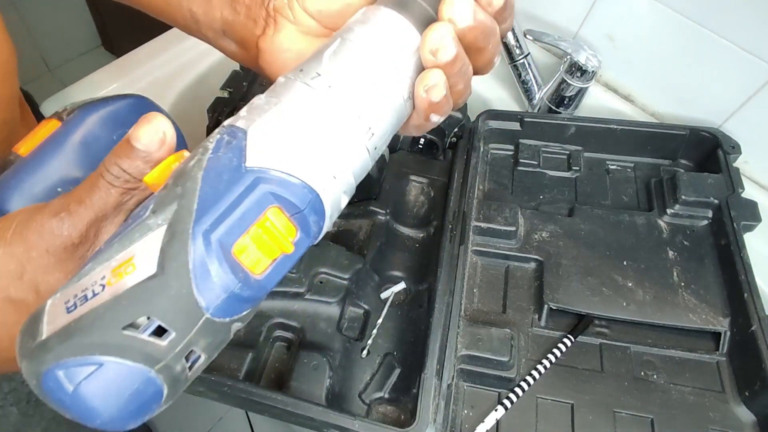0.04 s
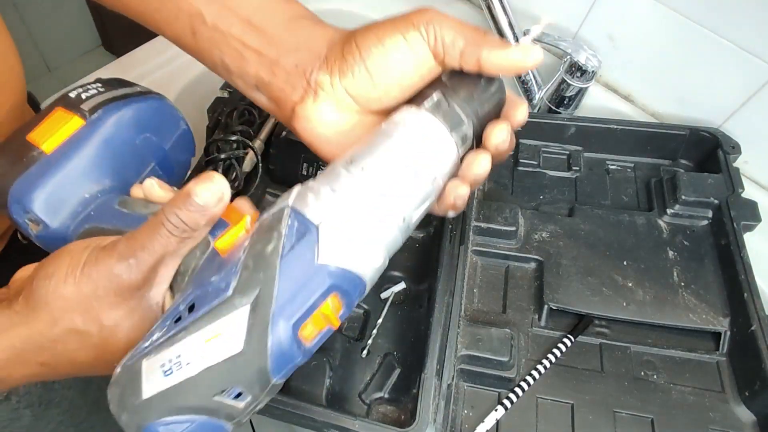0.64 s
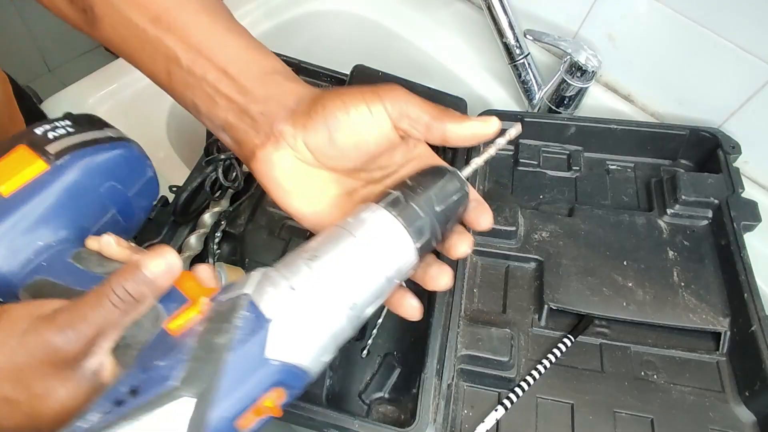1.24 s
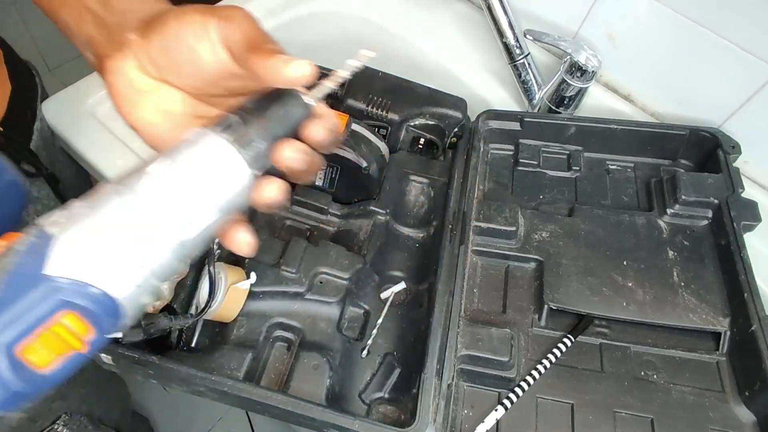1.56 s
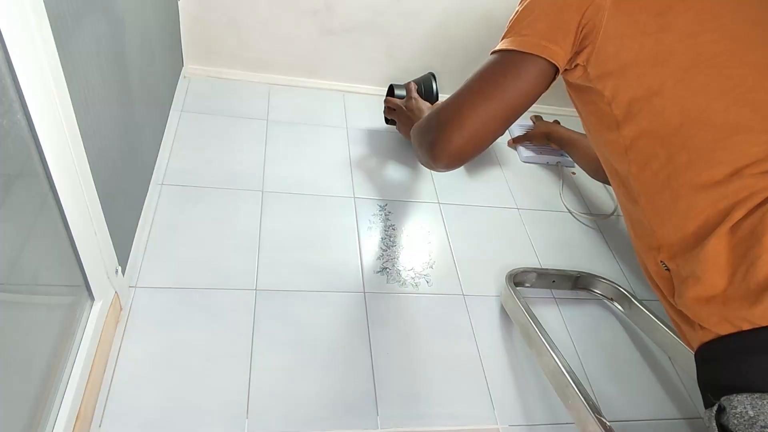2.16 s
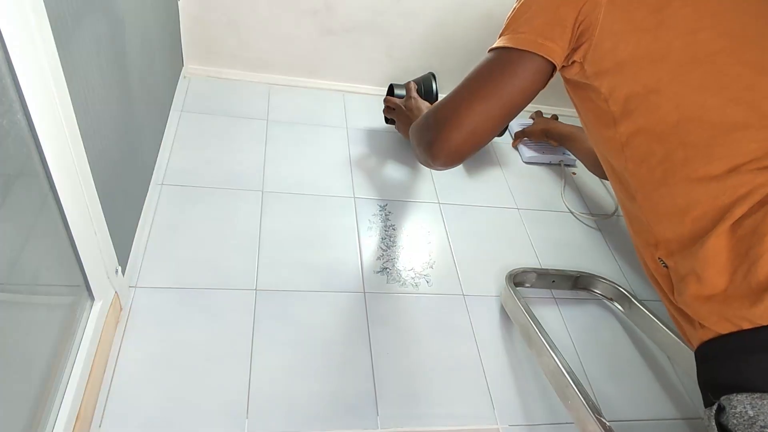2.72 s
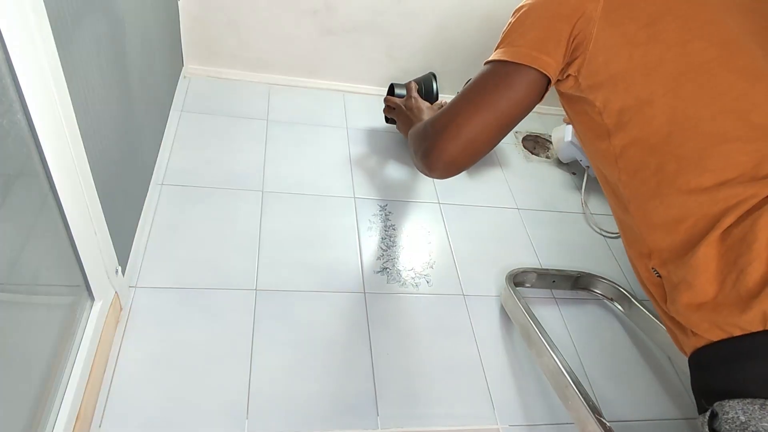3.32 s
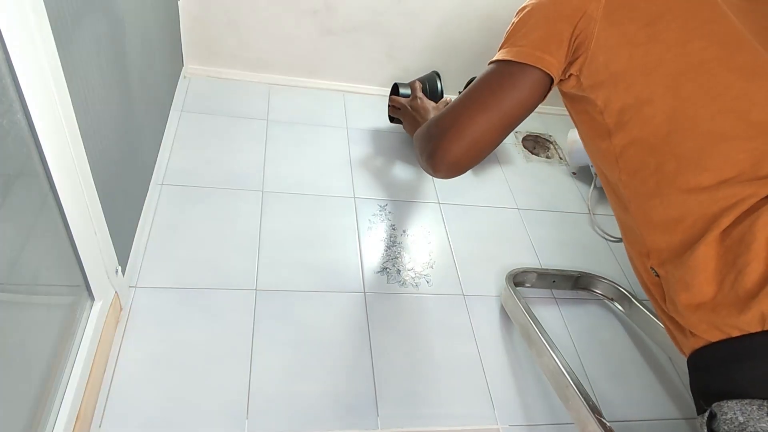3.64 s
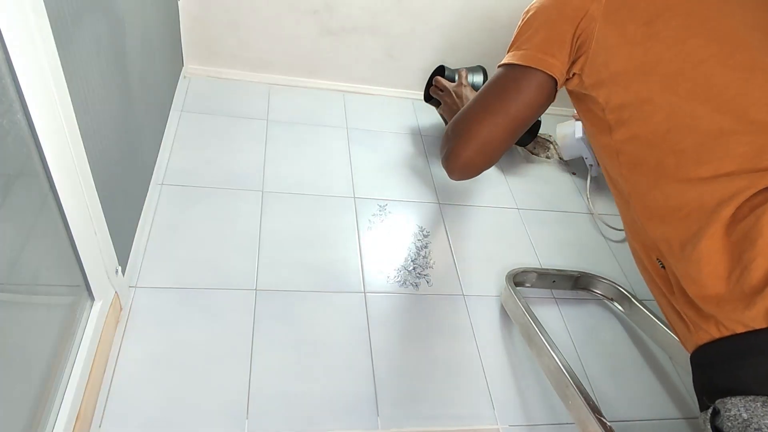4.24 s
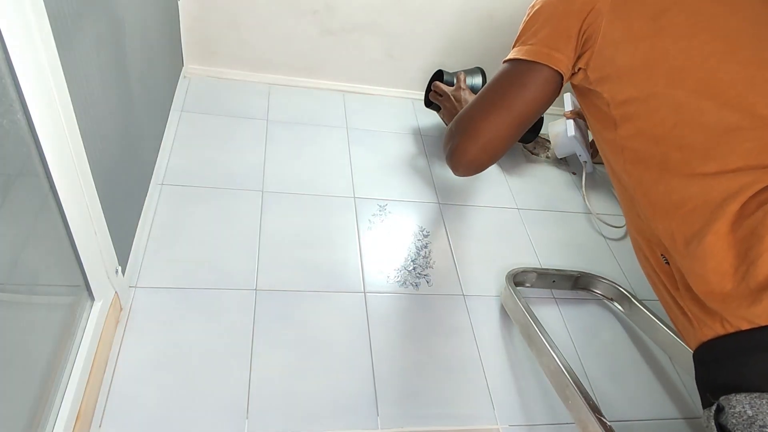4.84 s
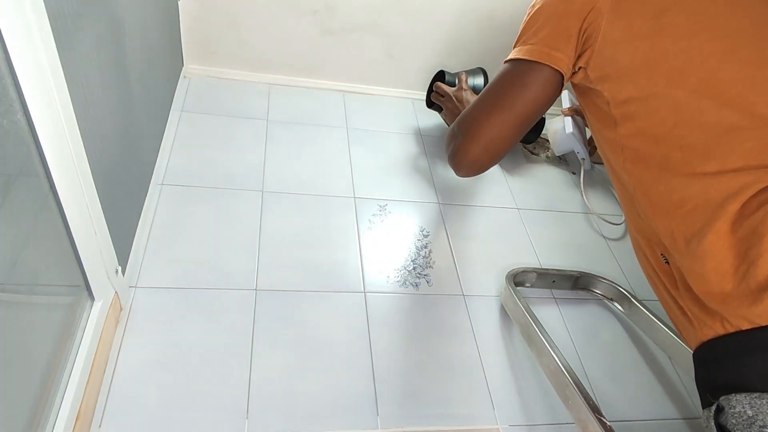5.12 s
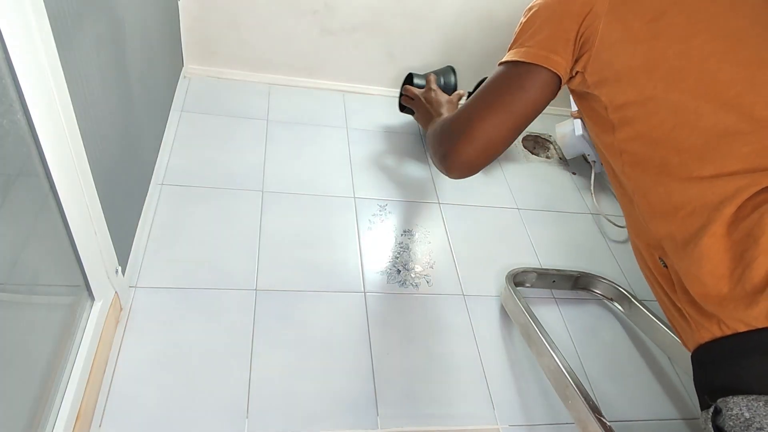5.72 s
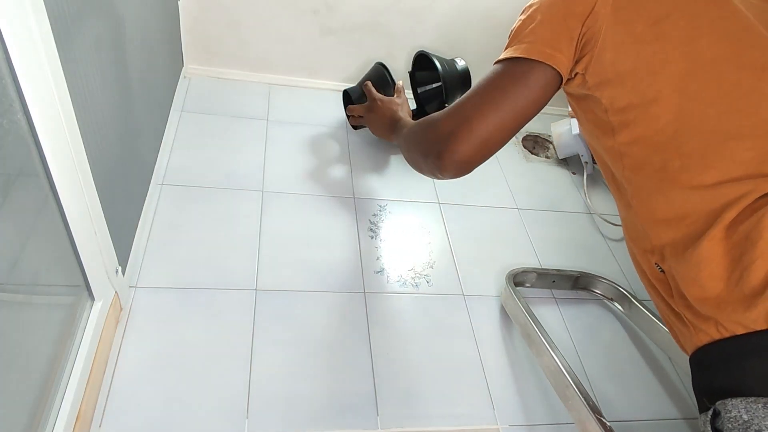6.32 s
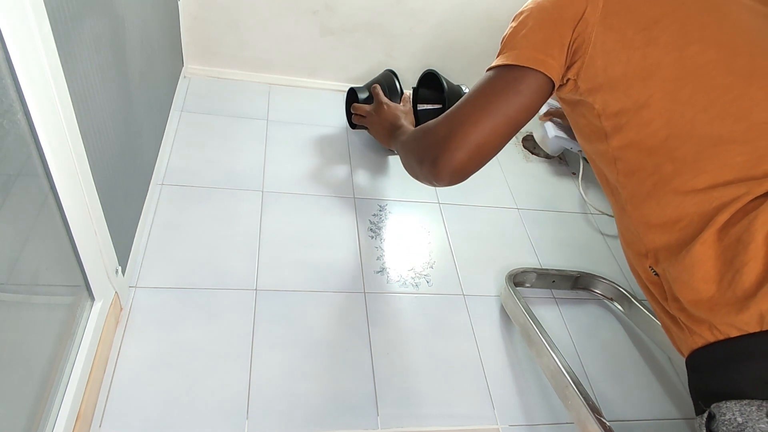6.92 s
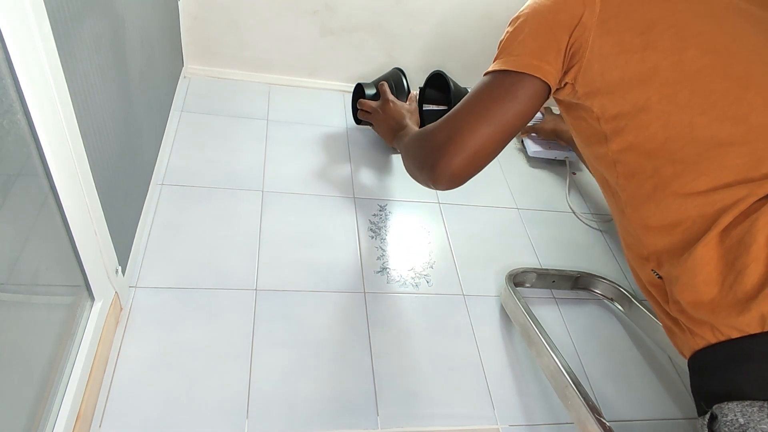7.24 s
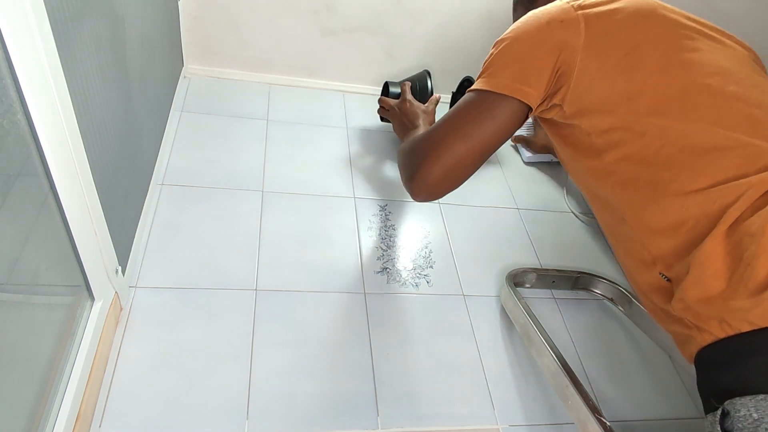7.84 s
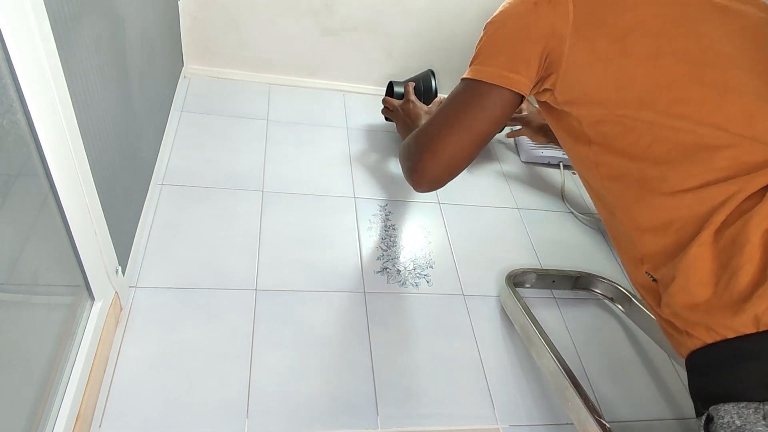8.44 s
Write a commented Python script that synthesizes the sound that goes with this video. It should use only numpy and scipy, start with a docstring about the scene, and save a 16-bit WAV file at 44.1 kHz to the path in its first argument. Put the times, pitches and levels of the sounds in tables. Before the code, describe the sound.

A cordless drill is already whirring at the start, close to the microphone and slightly left. It runs in five quick bursts, ending at about 1.4 seconds. The motor squeals, the gears whine upward and rattle, and each burst stops with a clack. A soft rub and a light tick follow around 2 seconds.

From 2.5 to 3 seconds, an arm's length further off and quieter, a hollow plastic mount scrapes and knocks against the wall with dull thumps. Lighter taps continue until about 4.5 seconds, and a hand rubs softly on the plastic from 3.5 to 6. After a lull, a sharper hollow knock comes near 6.8 seconds, followed by busier knocks, gritty scrapes and a few low thumps until about 8.6. The small tiled room rings briefly after the sounds. Faint hiss and a thin, steady high tone lie behind throughout.

```python
"""A cordless drill whirs close to the microphone in five quick bursts, a hand gripping its chuck:
the motor squeals, the gears whine up and rattle, then clack as the brake stops them.
An arm's length further off, a hollow plastic mount is shifted, scraped and knocked against a wall,
with a few dull thumps. A small tiled room rings after the drill and the mount.
Faint hiss and a thin, steady high tone lie behind it all."""
import sys
import numpy as np
from scipy import signal
from scipy.fft import rfft, irfft
from scipy.io import wavfile

SR = 44100
rng = np.random.default_rng(int(sys.argv[2]) if len(sys.argv) > 2 else 0)


def unload_audio(sound):
    """Save the sound as a 16-bit wav file, at the path given as the first command line argument."""
    columns = np.transpose(np.atleast_2d(sound))
    # keep every value between -1 and 1, then stretch to whole-number steps
    steps = np.round(np.clip(columns, -1, 1) * 32767)
    wavfile.write(sys.argv[1], SR, steps.astype(np.int16))


N = 382499
T = np.arange(N) / SR

# Pulls of the trigger; the first is already under way. Each row: press, rotor start and braking in
# seconds, top tooth rate in Hz, sluggishness of the run-up, then level, treble, squeal and whistle in dB.
TRIGGER_PULLS = [(-.19, -0.172, 0.068, 1705, 1.35, -15, 0.5, -39, 1),
                 (0.315, 0.35, 0.5, 1480, 1.55, -16, -1.5, -30, -2),
                 (0.62, 0.639, 0.795, 1552, 1.5, -16.5, -.5, -31.5, -6),
                 (0.933, .955, 1.138, 1634, 1.15, -16.5, .5, -31.5, 1),
                 (1.233, 1.248, 1.383, 1432, 1.55, -16.7, -2, -32, -5)]
def drill(run_up_share=.88, kick_share=.33, kick_s=.018, sag_share=.03, sag_s=.025, brake_s=.033):
    """Rattle and whine of a motor that jolts, runs up, sags as the trigger lifts and is braked."""
    size, teeth_per_turn = 70000, 5
    t = T[:size]
    speed, tooth_hz, gain, treble_gain, whistle = np.zeros((5, size))
    for _, start, brake, top_hz, sluggish, db, treble_db, _, whistle_db in TRIGGER_PULLS:
        progress = np.clip((np.minimum(t, brake) - start) / (run_up_share * (brake - start)), 0, 2)
        run_up = np.sin(np.pi / 2 * progress) ** sluggish
        kick = np.clip((t - start) / kick_s, 0, 1)
        sag = 1 - sag_share * np.clip(1 + (t - brake) / sag_s, 0, 1) ** 2
        drive = kick * (kick_share + (1 - kick_share) * run_up) * sag
        braking = np.clip(1 - (t - brake) / brake_s, 0, 1)
        spin = drive * braking
        speed += spin
        tooth_hz += top_hz * spin
        gain += undb(db) * drive ** .35 * braking
        treble_gain += undb(treble_db) * spin ** .67  # faster is brighter
        whistle += undb(whistle_db) * spin ** 5  # only near top speed
    grip = 1 + .005 * walk(600, size)  # the hand makes the speed waver
    rotor_phase = 2 * np.pi * np.cumsum(tooth_hz * grip) / SR / teeth_per_turn
    whine = gear_whine(rotor_phase, speed, whistle)
    rattle = gear_rattle(rotor_phase, speed) + chuck_jingle(size)
    low = cut(rattle, 2000, "low")
    rattle = low + treble_gain * (rattle - low)
    return np.pad(gain * rattle, (0, N - size)), np.pad(gain * whine, (0, N - size))


# Partials of the gears. Each row: multiple of the rotor rate, level in dB, power of growth with speed.
GEAR_PARTIALS = [(1, -24, .3), (2, -23, .7), (3, -21, 1), (4, -23, 1), (5, -16, .3), (10, -2, 1.9),
                 (14, -18, 2), (16, -17, 3), (17, -18, 3), (20, -19, 3), (25, -18, 3), (30, -18, 3),
                 (35, -20, 4)]
def gear_whine(rotor_phase, speed, whistle, level_db=1):
    """Meshing teeth sing under a wavering load; their third harmonic whistles."""
    size = len(speed)
    whine = sum(undb(db + 2.5 * walk(170, size)) * speed ** growth * np.sin(k * rotor_phase)
                for k, db, growth in GEAR_PARTIALS)
    whine += whistle * undb(2 * walk(170, size)) * np.sin(15 * rotor_phase)
    return undb(level_db) * whine


# The gearbox, heard from close by. Each row: frequency in Hz, level in dB.
GEARBOX_SPECTRUM = [(120, -57), (200, -24), (253, -14), (471, -12), (728, -0.5), (842, -5), (1190, -4),
                    (2210, -2), (2900, -1.5), (3550, -4.5), (4300, -0.5), (5050, -0.5), (7350, -8.5),
                    (8500, -5.5), (12000, -13.5), (15500, -13.5)]
# Resonances of the drill's housing. Each row: frequency in Hz, width in Hz, level in dB.
HOUSING_MODES = [(682, 82, 10), (1140, 110, -9.5), (3700, 120, -10.5), (4470, 40, -7), (5400, 380, 6)]
def gear_rattle(rotor_phase, speed, throb=.45, rasp_db=-3, housing_db=-9.5):
    """Loose teeth and brushes strike in bunches once a turn; worn teeth rasp alike on every turn."""
    size, harmonics = len(speed), 45
    bunching = 1 + throb * np.sin(rotor_phase)
    loose = unit(grains(spread_db=2.5, size=size) * bunching * undb(2.5 * walk(300, size)))
    rasp = sum(undb(4 * walk(25, size)) * np.sin(k * rotor_phase + 2 * np.pi * rng.random())
               for k in range(2, harmonics)) * np.sqrt(2 / harmonics)
    strikes = loose + undb(rasp_db) * speed * rasp
    return unit(colour(strikes, GEARBOX_SPECTRUM) + undb(housing_db) * ring(strikes, HOUSING_MODES))


# Resonances of the steel chuck. Each row: frequency in Hz, width in Hz, level in dB.
CHUCK_MODES = [(5894, 70, 2.5), (6300, 140, -2), (8350, 22, -1.5), (9300, 110, -2), (9900, 80, -0.5),
               (10430, 77, -0.5), (11600, 50, -10.5), (13300, 83, -7), (14500, 90, -6.5)]
def chuck_jingle(size, level_db=-11.5):
    """Tiny uneven impacts set the spinning chuck ringing."""
    impacts = grains(spread_db=7, size=size) * undb(3 * walk(200, size))
    return undb(level_db) * ring(impacts, CHUCK_MODES)


# Clicks of the spindle lock once the drill has stopped. Each row: start in seconds, level in dB.
LOCK_CLICKS = [(.538, -31), (.812, -28.5), (1.147, -22.5), (1.366, -26)]
# Their bright sound. Each row: frequency in Hz, level in dB.
LOCK_SPECTRUM = [(500, -25), (2500, -15), (5000, -6), (7500, -2), (10000, -7), (16000, -14)]
def clacks(take_up_s=.022, take_up_db=-18.5, clack_delay_s=.009, clack_db=-8, thud_db=-5):
    """The gears take up their slack on starting and hit its other side on braking; the spindle lock clicks once
    the motor stops."""
    take_up, clack, lock = np.zeros((3, N))
    for _, start, brake, _, _, db, *_ in TRIGGER_PULLS:
        if start > 0:
            add(take_up, start + take_up_s, undb(db + take_up_db) * blow(chatter_s=.016))
        add(clack, brake + clack_delay_s, undb(db + clack_db) * blow(chatter_s=.0045))
    for start, db in LOCK_CLICKS:
        add(lock, start, undb(db) * blow(chatter_s=.008))
    thud = colour(take_up + undb(thud_db) * clack, WALL_SPECTRUM)  # as dull as a knock on the wall
    return colour(clack, GEARBOX_SPECTRUM) + thud + colour(lock, LOCK_SPECTRUM)


# The squeal of the stalled motor. Each row: multiple of the switching rate, level in dB.
WINDING_PARTIALS = [(1, -16), (2, -1), (3, -12), (4, -22), (5, -26.5), (7, -29)]
def squeals(switching_hz=1302, bend=.055, overlap_s=.011, buzz_db=-17):
    """Chopped current sings and buzzes in the windings, bending up as the rotor breaks free."""
    out = np.zeros(N)
    for pressed, start, *_, db, _ in TRIGGER_PULLS:
        size = int((start - pressed + overlap_s) * SR)
        hz = switching_hz * (1 + bend * np.linspace(0, 1, size) ** 2)
        phase = 2 * np.pi * np.cumsum(hz * (1 + .018 * walk(900, size))) / SR
        tone = unit(sum(undb(partial_db) * np.sin(k * phase) for k, partial_db in WINDING_PARTIALS))
        buzz = colour(rng.standard_normal(size) * (1 + np.sin(phase)), GEARBOX_SPECTRUM)
        add(out, pressed, undb(db) * (tone + undb(buzz_db) * buzz) * signal.windows.tukey(size, .05))
    return out


# Knocks on the wall. Each row: start in seconds, wall level in dB, pitch of the struck spot in Hz,
# levels of the mount's hollow and shell in dB, chatter in seconds.
MOUNT_KNOCKS = [(2.532, -38.5, 960, -50, -59, 0.017), (2.795, -32, 1890, -60, -32, 0.019),
                (2.875, -41, 1930, -57, -46, 0.011), (3.028, -45.5, 795, -57, -59.5, 0.011),
                (3.215, -59, 950, -59.5, -65, 0.018), (3.34, -58, 1210, -77, -64, 0.013),
                (3.472, -55.5, 880, -56, -69, 0.007), (3.925, -48.5, 885, -44.5, -45.5, 0.01),
                (4.438, -47, 750, -49, -72, 0.0061), (6.157, -85, 1400, -79, -63, 0.008),
                (6.845, -39.5, 854, -34, -32, 0.005), (7.085, -39, 890, -51, -64, 0.0084),
                (7.269, -31, 1430, -45, -54, 0.0075), (7.415, -54.5, 1250, -50.5, -54.5, 0.044),
                (7.785, -46.5, 1240, -60, -66, 0.032), (7.887, -38, 1520, -50, -36.5, 0.019),
                (8.002, -45, 1020, -40, -37.5, 0.0014), (8.216, -39, 690, -70, -45, 0.009),
                (8.5, -43, 970, -48, -42, 0.011), (8.558, -43, 940, -39.5, -34, 0.0032)]
# The wall's dull answer. Each row: frequency in Hz, level in dB.
WALL_SPECTRUM = [(90, -30), (170, -11), (260, -1.5), (480, -2.5), (850, 0), (1500, -2.5), (2200, -8.5),
                 (4000, -16.5), (8000, -40.5), (16000, -50.5)]
# The mount's hollow body and thin shell. Each row: frequency in Hz, width in Hz, level in dB.
HOLLOW_MODES = [(442, 174, -5.5), (568, 78, 0), (902, 69, -3)]
SHELL_MODES = [(1955, 234, -2), (2340, 260, 5.5), (2660, 450, 1.5), (3030, 300, 2.5), (3440, 460, -2.5),
               (4440, 160, -10), (4950, 300, -9), (5930, 260, -10)]
def knocks(spot_width_hz=480, spot_db=-3.5, edge_db=-23.5):
    """Plastic hits the wall: the struck spot and the hollow body ring, and the shell gives a crack."""
    wall, spots, hollow, shell = np.zeros((4, N))
    for start, wall_db, spot_hz, hollow_db, shell_db, chatter_s in MOUNT_KNOCKS:
        contact = blow(chatter_s)
        push = undb(wall_db) * np.sqrt(.5) * contact
        spot = ring(np.pad(push, (0, len(push))), [(spot_hz, spot_width_hz, 0)])
        add(wall, start, push)
        add(spots, start, undb(spot_db) * spot)
        add(hollow, start, undb(hollow_db) * contact)
        add(shell, start, undb(shell_db) * contact)
    mount = plastic(hollow, HOLLOW_MODES) + plastic(shell, SHELL_MODES)
    edge = undb(edge_db) * colour(shell, EDGE_SPECTRUM)
    return colour(wall, WALL_SPECTRUM) + spots + mount + edge


def plastic(force, modes):
    """The small mount resonates but gives off little bass."""
    return cut(ring(force, modes), 206, "high", order=2)


# Touches of a hard edge. Each row: start in seconds, level in dB, chatter in seconds.
EDGE_TICKS = [(2.04, -57, 0.017), (2.502, -47, 0.0046), (6.64, -62.5, .01), (6.844, -59, .003),
              (7.89, -43.5, 0.014)]
# Their thin sound. Each row: frequency in Hz, level in dB.
EDGE_SPECTRUM = [(200, -56), (1500, -32), (3500, -20), (5200, 3.5), (6800, -11.5), (9000, -1.5),
                 (16000, -22)]
def ticks():
    """A hard edge makes light, brief contact."""
    contacts = np.zeros(N)
    for start, db, chatter_s in EDGE_TICKS:
        add(contacts, start, undb(db) * blow(chatter_s))
    return colour(contacts, EDGE_SPECTRUM)


# Scrapes over the tiles. Each row: start and length in seconds, grit level and wall level in dB.
TILE_SCRAPES = [(2.493, 0.16, -39, -47), (2.676, 0.21, -34.5, -39.5), (7.137, 0.28, -41, -45.5),
                (7.868, 0.058, -33.5, -69), (8.123, 0.27, -48.5, -55), (8.456, 0.08, -41.5, -64)]
# Their grit. Each row: frequency in Hz, level in dB.
GRIT_SPECTRUM = [(150, -11), (600, -3.5), (2200, 1), (5000, 1.5), (6800, -9.5), (9000, -4.5),
                 (12000, -10.5), (16000, -18)]
def scrapes():
    """The mount bites quickly and eases off, sounding the wall as it drags."""
    grit, wall = np.zeros((2, N))
    for start, length_s, grit_db, wall_db in TILE_SCRAPES:
        slide = stroke(length_s, rise=.17, fall=.83, spread_db=6.5, catch_db=3.5, catch_rate=102)
        add(grit, start, undb(grit_db) * slide)
        add(wall, start, undb(wall_db) * slide)
    return colour(grit, GRIT_SPECTRUM) + colour(wall, WALL_SPECTRUM)


# A hand on the mount. Each row: start and length in seconds, friction level and hollow level in dB.
HAND_RUBS = [(1.615, 0.32, -47.5, -86), (3.472, 0.39, -53, -61.5), (3.769, 0.42, -49.5, -55.5),
             (4.111, 0.26, -53.5, -60), (4.651, 0.43, -56, -70.5), (5.131, 0.2, -55, -62),
             (5.41, 0.45, -52, -60), (5.528, 0.29, -47.5, -49), (7.471, 0.79, -52.5, -56),
             (8.299, 0.46, -54.5, -64)]
# Skin on plastic. Each row: frequency in Hz, level in dB.
RUB_SPECTRUM = [(100, -42), (250, -8), (650, -12), (1250, -4.5), (1700, -3), (2050, 5), (2400, 5.5),
                (2800, -3.5), (3400, 5), (3900, -1.5), (5200, -0.5), (6800, -12.5), (9000, -6.5),
                (12000, -10), (16000, -9)]
def rubs():
    """Soft friction hisses on the plastic, and its low part stirs the hollow body."""
    friction, hollow = np.zeros((2, N))
    for start, length_s, db, hollow_db in HAND_RUBS:
        slide = stroke(length_s, rise=.15, fall=.48, spread_db=1, catch_db=3, catch_rate=35.2)
        add(friction, start, undb(db) * slide)
        add(hollow, start, undb(hollow_db) * cut(slide, 670, "low"))
    return colour(friction, RUB_SPECTRUM) + plastic(hollow, HOLLOW_MODES)


def stroke(length_s, rise, fall, spread_db, catch_db, catch_rate):
    """Sliding that catches and slips, swelling and fading over shares of its length."""
    size = int(length_s * SR)
    along = np.linspace(0, 1, size)
    pressure = np.clip(np.minimum(along / rise, (1 - along) / fall), 0, 1)
    return pressure * unit(grains(spread_db, size) * undb(catch_db * walk(catch_rate, size)))


def blow(chatter_s, clean_s=.0025, build_share=.22, size=2048):
    """One clean tap if the contact is brief, else a chatter that builds and settles."""
    t = T[:size]
    envelope = np.exp(-t / chatter_s) * (1 - np.exp(-t / (build_share * chatter_s)))
    chatter = unit(rng.standard_normal(size) * envelope)
    tap_share = np.exp(-chatter_s / clean_s)
    return np.sqrt(1 - tap_share) * chatter + np.sqrt(tap_share) * unit(signal.unit_impulse(size))


# Dull thumps under the handling. Each row: start in seconds, relative level in dB.
LOW_THUMPS = [(2.576, -49.5), (2.778, -53.5), (7.283, -38), (7.4, -52), (7.746, -58), (7.899, -49),
              (8.252, -48)]
# Their low notes. Each row: frequency in Hz, level in dB, time to fall 60 dB in seconds.
BOOM_MODES = [(71, -15, 0.15), (126, 2.5, 0.15), (151, 6, 0.11), (191.5, -8, 0.37)]
def thumps(swell_s=.031):
    """Soft low booms swell and die quickly."""
    out, t = np.zeros(N), T[:8192]
    swell = np.minimum(t / swell_s, 1) ** 2
    for start, db in LOW_THUMPS:
        boom = swell * sum(undb(mode_db - 60 * t / t60) * np.sin(2 * np.pi * (hz * t + rng.random()))
                           for hz, mode_db, t60 in BOOM_MODES)
        add(out, start, undb(db) * 2 * boom / np.abs(boom).max())
    return out


# The small tiled room. Each row: frequency in Hz, time to fall 60 dB in seconds at a decay_share of 1.
TILE_DECAY = [(125, 0.038), (300, 0.52), (700, 0.59), (1500, 0.49), (3200, 0.44), (6000, 0.42),
              (13000, 0.19)]
SIDE = np.array([[1], [-1]])  # opposite signs left and right
def room(x, direct_db, lag_s, shared_hz, decay_share, size=32768):
    """Direct sound reaches the left channel first; the tail off the tiles is shared only in the bass."""
    t, freqs = T[:size], np.fft.rfftfreq(size, 1 / SR)
    band_hz, t60s = np.transpose(TILE_DECAY)
    likeness = np.exp(-(freqs / shared_hz) ** 2)
    mid, side = rfft(rng.standard_normal((2, size)))
    field = mid * np.sqrt(1 + likeness) + SIDE * side * np.sqrt(1 - likeness)
    response = np.zeros((2, size))
    for band, t60 in zip(np.eye(len(band_hz)), t60s):
        weight = np.interp(np.log(freqs + 1), np.log(band_hz), band)
        response += irfft(field * weight) * undb(-60 * t / (decay_share * t60))
    response *= np.clip(t / .0011, 0, 1)
    response /= np.linalg.norm(response[0])
    response[0, 0] += undb(direct_db)
    response[1, int(lag_s * SR)] += undb(direct_db)
    return np.array([through(x, channel) for channel in response])


# The quiet room at the microphone. Each row: frequency in Hz, level in dB.
HISS_SPECTRUM = [(30, -26.5), (100, -19), (160, -19.5), (220, 1), (330, -2), (500, -2.5), (1000, -7.5),
                 (2000, -10), (4500, -13.5), (7000, -23.5), (10000, -17), (16000, -18)]
def background(hiss_db=-65, tone_hz=10042, tone_db=-77.5):
    """Faint room noise, centred in the bass, and a thin tone that is out of step left and right."""
    mid, side = (colour(rng.standard_normal(N), HISS_SPECTRUM) for _ in range(2))
    hiss = undb(hiss_db + .7 * walk(14)) * (mid + undb(1.5) * cut(side, 450, "high") * SIDE)
    phase = 2 * np.pi * np.cumsum(tone_hz + 9 * walk(150)) / SR
    return hiss + undb(tone_db) * unit(np.array([np.sin(phase), np.cos(phase)]))


def undb(db):
    """Decibels to gain."""
    return 10 ** (np.asarray(db) / 20)


def unit(x):
    """Scale to rms 1."""
    return x / np.sqrt(np.mean(x ** 2) + 1e-20)


def add(track, start_s, x):
    """Mix x into the track at start_s, or at zero if that is earlier."""
    i = max(int(start_s * SR), 0)
    track[i:i + len(x)] += x[:max(N - i, 0)]


def grains(spread_db, size):
    """Dense tiny impacts of unequal size, rms 1."""
    return unit(rng.standard_normal(size) * undb(spread_db * np.minimum(rng.exponential(size=size), np.pi)))


def walk(rate, size=N):
    """A random drift with rate turns a second and a spread near 1."""
    turns = np.arange(size // 20)
    return np.interp(T[:size] * rate, turns, rng.standard_normal(len(turns)))


def cut(x, hz, kind, order=1):
    """Low-pass or high-pass."""
    return signal.sosfilt(signal.butter(order, hz, kind, fs=SR, output="sos"), x)


def through(x, response):
    """Pass x through a response scaled to keep the power of white noise."""
    return signal.oaconvolve(x, response / np.linalg.norm(response))[:len(x)]


def colour(x, points, size=2048):
    """Minimum-phase filter with the given (Hz, dB) outline."""
    hz, db = np.transpose(points)
    outline = np.interp(np.log(np.fft.rfftfreq(size, 1 / SR) + 1), np.log(hz), db)
    cepstrum = irfft(np.log(undb(outline)))
    cepstrum[1:size // 2] *= 2
    cepstrum[size // 2 + 1:] = 0
    return through(x, irfft(np.exp(rfft(cepstrum))))


def ring(x, modes):
    """A body with (Hz, width in Hz, dB) resonances, driven by x."""
    t = T[:4096]
    response = sum((-1) ** k * undb(db) * width * np.exp(-np.pi * width * t) * np.sin(2 * np.pi * hz * t)
                   for k, (hz, width, db) in enumerate(modes))
    return through(x, response)


def scene():
    """The drill is close, a little left, its whine aimed at the microphone; the mount is further off."""
    rattle, whine = drill()
    clatter = cut(rattle + clacks(), 235, "high", order=5)  # drill and mount are too small for bass
    near = room(clatter, direct_db=-1, lag_s=.00027, shared_hz=604, decay_share=.84)
    tones = cut(whine + squeals(), 235, "high", order=5)
    near += room(tones, direct_db=5, lag_s=.0001, shared_hz=600, decay_share=.65)
    handling = cut(knocks() + ticks() + scrapes() + rubs(), 144, "high", order=2)
    far = room(handling, direct_db=-3.5, lag_s=.00026, shared_hz=650, decay_share=1)
    booms = thumps() + undb(-7) * thumps() * SIDE
    return near * undb([[.3], [-.8]]) + far * undb([[.8], [.2]]) + booms + background()


def record(dry, ceiling=.85, bass_hz=60, top_hz=15800):
    """The microphone rounds only the very highest peaks, thins the deep bass and cuts the top."""
    rounded = dry / (1 + (dry / ceiling) ** 6) ** (1 / 6)
    thinned = cut(rounded, bass_hz, "high", order=2)
    return signal.sosfilt(signal.ellip(10, .2, 80, top_hz, fs=SR, output="sos"), thinned)


dry = scene()
out = record(dry)
unload_audio(out)
```